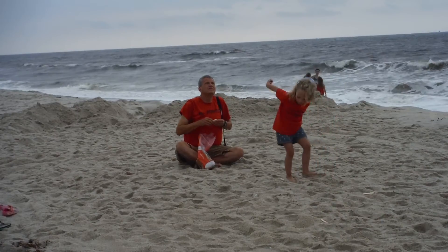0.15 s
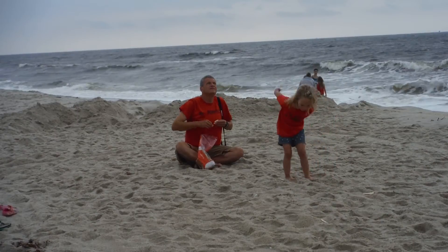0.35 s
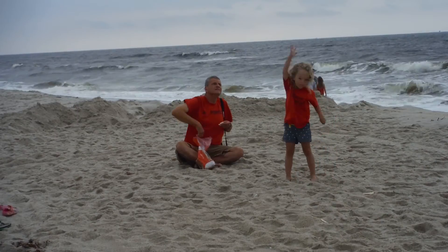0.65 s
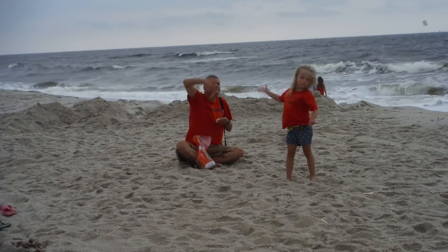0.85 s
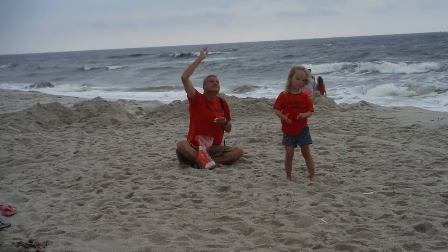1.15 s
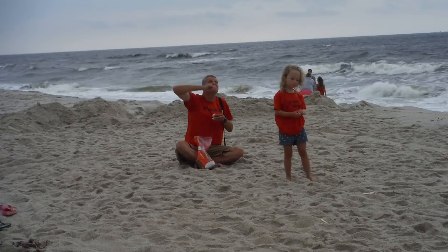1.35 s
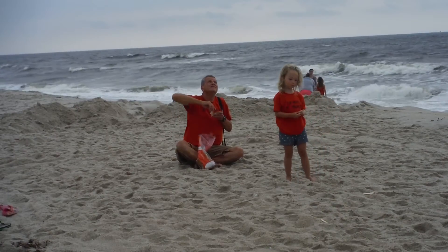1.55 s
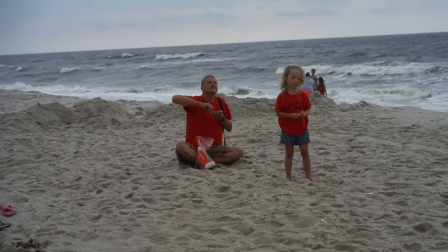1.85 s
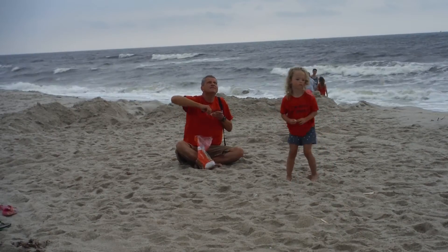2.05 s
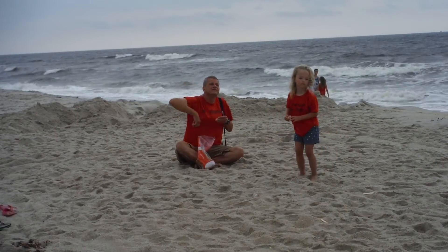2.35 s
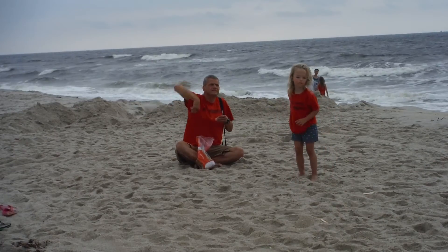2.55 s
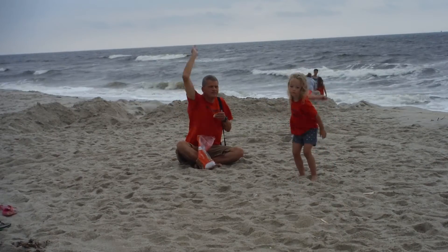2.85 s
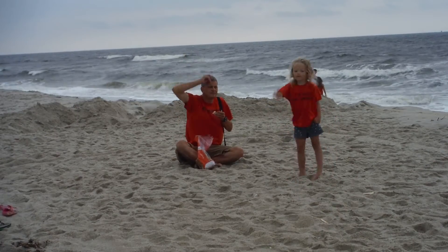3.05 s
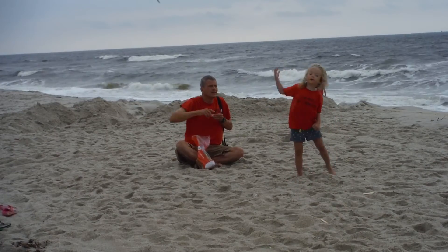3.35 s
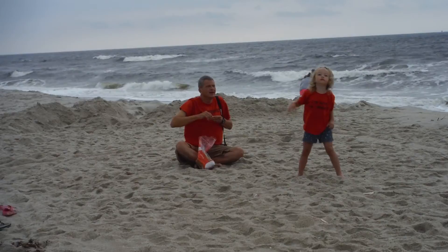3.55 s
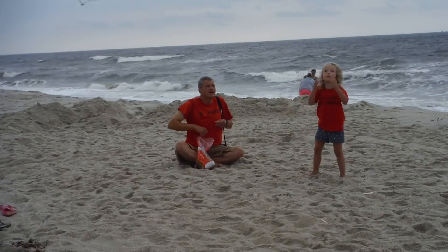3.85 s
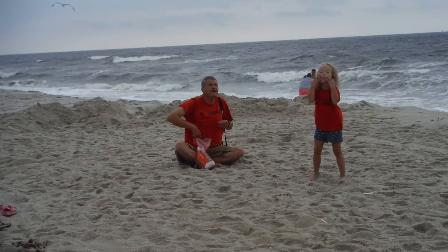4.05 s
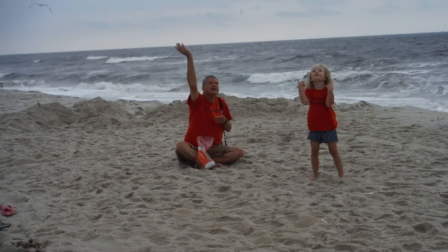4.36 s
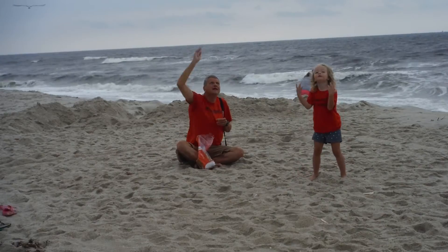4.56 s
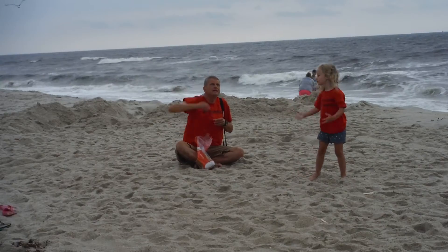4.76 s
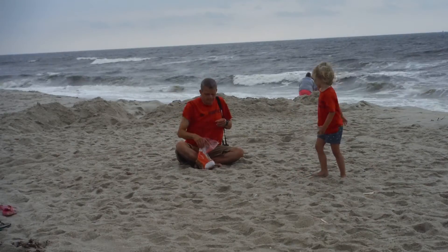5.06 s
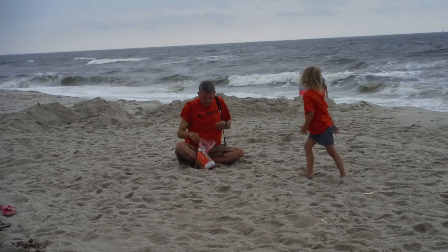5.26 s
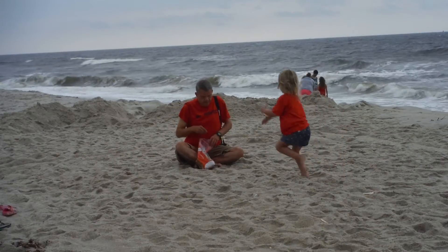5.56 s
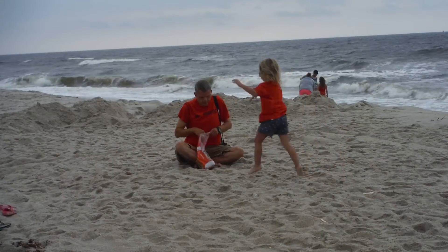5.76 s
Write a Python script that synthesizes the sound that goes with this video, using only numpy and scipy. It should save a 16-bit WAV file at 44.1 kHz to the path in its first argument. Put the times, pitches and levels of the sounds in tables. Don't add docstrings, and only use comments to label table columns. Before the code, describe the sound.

High piercing gull cries and harsh squawks come in bursts above hissing surf, with low wind buffeting bumping a small microphone.

```python
import sys
import numpy as np
from scipy import signal
from scipy.io import wavfile
from scipy.ndimage import uniform_filter1d

SR = 44100
rng = np.random.default_rng(int(sys.argv[2]) if len(sys.argv) > 2 else 0)


def convert_level_to_amplitude(level_db):
    exponent = np.asarray(level_db, float) / 20
    return 10 ** exponent


def wav_record(signal):
    frames = np.transpose(np.atleast_2d(signal))
    bounded = np.clip(frames, -1, 1)
    quanta = np.round(bounded * 32767).astype(np.int16)
    wavfile.write(sys.argv[1], SR, quanta)


N = 260190


def evened(x):
    return x / np.sqrt(np.mean(x ** 2) + 1e-20)


def read(points, hz):
    f, value = np.transpose(points)
    return np.interp(np.log(hz + 1), np.log(f + 1), value)


def add(mix, s, sound):
    part = mix[max(round(s * SR), 0):][:len(sound)]
    part += sound[:len(part)]


def wobble(size, smooth):
    width = max(round(smooth), 1)
    once = uniform_filter1d(rng.standard_normal(N), width)
    return evened(uniform_filter1d(once, width))[:size]


# (time [s], swell [dB])
BREAKERS = [
    (0, -54),
    (1.25, -53.5),
    (2.1, -52),
    (2.85, -52),
    (3.25, -49),
    (4.1, -48.5),
    (4.8, -48.5),
    (5.9, -50),
]
# (frequency [Hz], level [dB])
WASH_COLOUR = [(120, -28), (200, -11), (310, -6), (352, -7), (575, -10.5), (993, -14.5), (1260, -15),
               (1590, -17.5), (3130, -20.5), (4420, -24.5), (5300, -22.5), (8060, -22.5), (15500, -49)]


def surf():
    frames, hz = N // 256 + 5, np.fft.rfftfreq(1024, 1 / SR)
    real, imaginary, patches = rng.standard_normal((frames, 513, 3)).T
    patches = uniform_filter1d(patches, 16, 0)
    patches = evened(uniform_filter1d(patches, 10, 1))
    s, body_db = np.transpose(BREAKERS)
    fizz_db = -11 + 0.44 * (body_db + 51)
    t = np.arange(frames) * 256 / SR
    fizz_share = np.clip(np.log2(hz / 2500 + 1e-9) / 2.06, 0, 1)[:, None]
    field_db = read(WASH_COLOUR, hz)[:, None] + np.interp(t, s, body_db) + 1.26 * patches
    field_db = field_db + fizz_share * (np.interp(t, s, fizz_db) + 17.5)
    field = (real + 1j * imaginary) * convert_level_to_amplitude(field_db - 43)
    return convert_level_to_amplitude(49.5) * signal.istft(field, nperseg=1024, noverlap=768)[1][:N]


def eddy(hz):
    u = np.arange(-4, 4, 2 * np.pi * hz / SR)
    return -u * np.exp(.5 - u ** 2 / 2)


# (time [s], rumble [dB])
GUST_CURVE = [(0, -14), (.1, -29.5), (.34, -21.5), (.92, -20.5), (1.6, -31), (2.02, -31), (2.28, -17),
              (2.68, -20), (2.8, -28), (3.04, -31), (3.1, -19), (3.36, -18), (3.5, -28), (3.68, -30),
              (3.71, -19), (4.12, -26), (4.6, -31), (5.9, -28)]
# (frequency [Hz], level [dB], share of flutter [ratio])
EDDY_SIZES = [
    (26.2, 1, 0),
    (44.36, 5, 0.53),
    (70.4, 1.5, 0.42),
    (108.3, 0.5, 1.27),
    (174, -11, 3),
    (283, -14, 2.5),
]


def wind_rumble():
    s, rumble_db = np.transpose(GUST_CURVE)
    flutter_db = -2 - 0.25 * (rumble_db + 32)
    t, out = np.arange(N) / SR, np.zeros(N)
    lumps_db = 2.0 * wobble(N, smooth=1500)
    for hz, db, share in EDDY_SIZES:
        size = rng.standard_normal(N) * convert_level_to_amplitude(1.16 * np.minimum(rng.exponential(1, N), 4))
        train = size * (rng.random(N) < 1.6 * hz / SR)
        gust_db = np.interp(t, s, rumble_db + share * flutter_db)
        level_db = uniform_filter1d(db - 5.5 + gust_db + share * lumps_db, 400)
        out += evened(signal.oaconvolve(train, eddy(hz), "same")) * convert_level_to_amplitude(level_db)
    return out


# (time [s], peak [dB])
SHARP_POPS = [(0.0209, -15.5), (0.036, -14), (0.5206, -11.5), (0.8374, -11.5), (.967, -13), (0.9928, -15),
              (1.2211, -16), (2.3493, -18), (2.457, -15), (3.1087, -14), (3.189, -13.5), (3.2899, -13.5),
              (3.791, -16), (3.901, -14), (4.3772, -12)]
# (time [s], peak [dB])
HEAVY_THUDS = [(.513, -18), (0.599, -12), (0.809, -8.5), (1.78, -26), (3.103, -18.5), (3.178, -13),
               (3.265, -12.5), (3.345, -11.5), (3.73, -17), (5.044, -24), (.012, -16), (.63, -19),
               (1.36, -21), (1.45, -23), (3.44, -23), (5.3, -23)]
# (time [s], peak [dB], frequency [Hz])
CRISP_SNAPS = [(.373, -15.5, 254), (0.8206, -9.5, 316), (0.8693, -3, 564), (.932, -27, 330),
               (.965, -22, 398), (.991, -23, 400), (1.0894, -19.5, 326), (1.212, -20, 423),
               (1.223, -29, 420), (2.2806, -17, 227), (2.337, -12.5, 372), (2.689, -22, 290),
               (3.157, -21, 370), (4.003, -13.5, 220)]
# (time [s], peak [dB], frequency [Hz])
BROAD_SHOVES = [(0.246, -15, 37.7), (0.274, -16.5, 118), (0.34, -19, 61.9), (0.496, -12.5, 80.7),
                (0.579, -16, 48.4), (0.79, -10.5, 80.7), (1.282, -19, 53.8), (1.441, -21, 37.7),
                (1.627, -22, 37.7), (1.908, -19, 37.7), (2.114, -14, 64.6), (2.257, -12, 75.4),
                (2.474, -15, 51.1), (2.623, -18, 70.0), (2.921, -20, 61.9), (3.093, -24, 37.7),
                (3.1, -15, 61.9), (3.696, -19, 56.5), (3.713, -9, 43.1), (3.968, -14, 40.4),
                (4.063, -14.5, 53.8), (4.352, -14, 37.7), (4.726, -20, 80.7), (5.062, -19, 78.1),
                (5.211, -14, 59.2), (5.424, -20, 86.1), (5.546, -20, 67.3), (5.707, -25, 37.7)]


def wind_thumps():
    pop_hz, thud_hz = 166, 106
    out = np.zeros(N)
    hits = [(*pop, pop_hz) for pop in SHARP_POPS]
    hits += [(*thud, thud_hz) for thud in HEAVY_THUDS]
    for s, db, hz in hits + list(CRISP_SNAPS):
        add(out, s - 2 / (np.pi * hz), convert_level_to_amplitude(db) * eddy(hz))
    for s, db, hz in BROAD_SHOVES:
        add(out, s - 1 / (np.pi * hz), convert_level_to_amplitude(db - 6.5) * eddy(hz))
    return out


# (time [s], peak [dB])
STRAP_TICKS = [
    (0.2226, -39.5),
    (.266, -42),
    (0.696, -35.5),
    (.824, -29.5),
    (1.308, -40.5),
    (1.575, -32),
    (3.4446, -35),
]


def strap():
    tick_hz, decay_s, rise_s = 1232, 0.029, 0.00042
    t, out = np.arange(2000) / SR, np.zeros(N)
    for s, db in STRAP_TICKS:
        envelope = convert_level_to_amplitude(db + 8.0 - 60 * t / decay_s) * (1 - np.exp(-t / rise_s))
        add(out, s, envelope * np.sin(2 * np.pi * tick_hz * t))
    return out


LEVEL, HOLD, ARCH = (0.98, 0.98, 1.005), (.985, 1, 1.002, .97), (.95, 1, 1.005, .99, .91)
RISE, CLIMB, SWOOP = (0.98, 0.99, 1.045), (0.901, 0.991, 1.021, 1.035), (0.86, 0.94, 1.2)
SAG, FALL, SLACK = (1.025, 0.98, 0.94), (1.2, 1.05, 1, .98), (1.035, 0.99, 1.015)
CUP, DIP, SCOOP = (1.025, 1, 1.05), (1.07, 0.98, 1.08), (1.04, .985, .995, 1.045, 1.12)
FLIP, DROOP, HUMP = (.96, 1.02, 1, .88), (1, 1.01, .97, .92), (.97, 1.01, 1, .9)
WEDGE, STEADY, BOWL = (.93, 0.99, 1), (.997, 1, 1.003), (1.045, .985, 1, 1.065)


def bent(rows):
    return [(a, b, *(hz * np.array(bend)), db, *rest) for a, b, hz, db, bend, *rest in rows]


def joined(rows, leap=9):
    groups = [[rows[0]]]
    for row in rows[1:]:
        last = groups[-1][-1]
        if abs(row[0] - last[1]) < .007 and row[2] < leap * last[-2]:
            groups[-1].append(row)
        else:
            groups.append([row])
    return groups


# (frequency [Hz], level [dB])
OVERTONE_COLOUR = [(1000, -16), (2000, 2.5), (3500, 3), (5000, 0), (7000, 7.5), (8500, 0), (10300, -9.5),
                   (11500, -40), (15500, -28)]


def phrase(rows, tilt_db, split, under_db, jitter, drift, edge=0.0026, low_db=-8, flicker_db=4):
    note_fade_db, release = 1, 1.48
    hz, level_db = [], []
    ends = [row[0] for row in rows[1:]] + [rows[-1][1]]
    for (a, _, *pitch_hz, db), end in zip(rows, ends):
        u = np.linspace(0, 1, max(round((end - a) * SR), 8))
        spread = np.linspace(0, 1, len(pitch_hz))
        hz.append(np.polyval(np.polyfit(spread, pitch_hz, len(pitch_hz) - 1), u))
        level_db.append(db - note_fade_db * (u - .5))
    hz = uniform_filter1d(np.concatenate(hz), size=130, mode="nearest")
    level_db = uniform_filter1d(np.concatenate(level_db), size=130, mode="nearest")
    shake = drift[:, round(rows[0][0] * SR):][:, :len(hz)]
    turns = np.cumsum(hz * (1 + jitter * shake[0])) / SR
    k = np.arange(1, 8 * split + 1)[:, None] / split
    colour_db = read(OVERTONE_COLOUR, k * hz) - read(OVERTONE_COLOUR, hz)
    colour_db = colour_db + tilt_db * np.log2(np.maximum(k, 1))
    undertone_db = under_db + flicker_db * shake[1, ::-1]
    colour_db = colour_db + undertone_db * (k % 1 > 0) + low_db * (k < 1)
    partials = convert_level_to_amplitude(colour_db) * (k * hz < 16000) * np.cos(2 * np.pi * k * turns)
    tone = partials.sum(0)
    level_db = level_db - np.minimum(0.6 * abs(np.gradient(hz)), 17)
    n = np.arange(len(hz))
    fade = np.clip(np.minimum(n, n[::-1] / release) / (edge * SR), 0, 1)
    return -np.sqrt(2) * convert_level_to_amplitude(level_db + 1.55 * shake[1]) * tone * fade


def sung(groups, lead_s=.002, **voice):
    out = np.zeros(N)
    for rows in groups:
        add(out, rows[0][0] - lead_s, phrase(rows, **voice))
    return out


# (start [s], end [s], pitch [Hz], level [dB], bend [ratios])
THIN_NOTES = [(1.657, 1.757, 4870, -32, STEADY), (1.757, 1.778, 4900, -38, STEADY),
              (1.12, 1.18, 3190, -48, SAG), (1.18, 1.203, 3080, -46, HUMP), (1.232, 1.275, 3450, -35, DROOP),
              (1.275, 1.312, 3260, -35.5, HUMP), (1.885, 1.91, 3680, -43.5, SAG),
              (2.11, 2.133, 4610, -34, ARCH), (3.345, 3.39, 3010, -42, SAG), (3.39, 3.43, 3210, -42, CLIMB),
              (3.43, 3.52, 3510, -39, LEVEL), (3.52, 3.61, 3600, -41, HOLD), (3.635, 3.675, 3700, -41, RISE),
              (3.635, 3.665, 3290, -38, ARCH), (3.49, 3.53, 3170, -44, SAG), (3.545, 3.6, 3240, -47, LEVEL),
              (1.779, 1.798, 4850, -30, HUMP), (3.775, 3.82, 1605, -42, SWOOP),
              (2.468, 2.496, 1890, -41, SWOOP), (4.685, 4.712, 1810, -42, SWOOP)]


def thin_whistles(drift):
    return sung(joined(bent(THIN_NOTES)), tilt_db=-17.5, split=1, under_db=0, jitter=0.0043, drift=drift)


# (start [s], end [s], pitch [Hz], level [dB], bend [ratios])
BLEND_TONES = [(2.69, 2.732, 5400, -42, LEVEL), (2.69, 2.728, 4080, -47, RISE),
               (2.758, 2.797, 5540, -37, SLACK), (2.762, 2.797, 7850, -42, LEVEL),
               (2.76, 2.795, 4050, -44, SAG), (2.662, 2.68, 7700, -44, SAG),
               (1.598, 1.612, 4560, -36, STEADY), (1.61, 1.628, 8600, -42, WEDGE),
               (1.787, 1.796, 6450, -43, RISE), (4.705, 4.735, 6680, -36, STEADY),
               (4.888, 4.92, 5500, -42, SAG), (4.93, 4.957, 3480, -40, RISE),
               (3.635, 3.655, 7500, -41, RISE), (3.895, 3.912, 6350, -44, STEADY),
               (3.935, 3.943, 5300, -44, STEADY)]


def membrane_blends(drift):
    groups = [[row] for row in bent(BLEND_TONES)]
    return sung(groups, tilt_db=-30, split=1, under_db=0, jitter=.004, drift=drift, edge=.004)


# (start [s], end [s], pitch [Hz], level [dB], bend [ratios])
SECOND_NOTES = [
    (1.071, 1.096, 1630, -52, SWOOP),
    (1.341, 1.374, 2170, -44.5, ARCH),
    (2.64, 2.658, 2220, -34.5, RISE),
    (2.693, 2.736, 2230, -39.5, LEVEL),
    (2.755, 2.8, 2315, -35.5, LEVEL),
    (3.852, 3.88, 3800, -35, FALL),
    (3.842, 3.902, 1900, -38.5, FALL),
    (.386, .4, 2850, -44, LEVEL),
    (1.603, 1.63, 2520, -42, LEVEL),
    (1.777, 1.786, 2600, -41, LEVEL),
]


def second_membrane(drift):
    groups = [[row] for row in bent(SECOND_NOTES)]
    return sung(groups, tilt_db=-6.5, split=0.97, under_db=1.0, jitter=.005, drift=drift)


# (start [s], end [s], first rate [1/s], last rate [1/s], level [dB])
SLOW_CREAKS = [
    (1.755, 1.781, 500, 570, -35),
    (4.285, 4.315, 560, 640, -37),
    (2.842, 2.864, 700, 520, -34),
    (1.343, 1.378, 700, 520, -37.5),
    (3.912, 3.936, 600, 510, -40),
]
# (frequency [Hz], level [dB])
THROAT_COLOUR = [(590, -72), (1000, -19.5), (1400, -11.5), (1560, -16), (1860, -9.5), (2420, -3),
                 (2710, -0.5), (4220, -1), (5350, -8.5), (6560, -5.5), (9750, -20.5), (15000, -44)]


def throat():
    hz = abs(np.fft.fftfreq(2048, 1 / SR))
    log_gain = np.log(convert_level_to_amplitude(np.maximum(read(THROAT_COLOUR, hz), -60)))
    return np.fft.ifft(np.exp(log_gain - 1j * signal.hilbert(log_gain).imag)).real[:512]


def gull_creaks():
    out = np.zeros(N)
    for a, b, first_hz, last_hz, db in SLOW_CREAKS:
        u = np.linspace(0, 1, round((b - a) * SR))
        chance = rng.standard_normal((2, 4000))[:, :len(u)]
        rate_hz = first_hz + (last_hz - first_hz) * u
        turns = np.cumsum(rate_hz * (1 + .6 * chance[0])) / SR
        slaps = np.diff(np.floor(np.maximum.accumulate(turns)), prepend=0) * convert_level_to_amplitude(1.5 * chance[1])
        dull = evened(np.convolve(slaps, throat())[:len(u)])
        bright = 1.2 * u * np.gradient(dull)
        add(out, a, convert_level_to_amplitude(db) * np.sin(np.pi * u) ** 0.58 * (dull + bright))
    return out


# (start [s], end [s], pitch [Hz], level [dB], bend [ratios], undertones [dB])
HOARSE_NOTES = [(1.089, 1.134, 2360, -37.5, SAG, 2.5), (2.071, 2.096, 2615, -30, RISE, 4),
                (2.495, 2.541, 2374, -30, SAG, 3.5), (2.59, 2.674, 2200, -39.5, RISE, 4.5),
                (3.314, 3.345, 2370, -39, RISE, -4), (3.675, 3.729, 2214, -42, CLIMB, 7),
                (3.815, 3.857, 2280, -32.5, LEVEL, 4.5), (4.706, 4.742, 2230, -34, RISE, 7),
                (4.775, 4.83, 1880, -43, LEVEL, -5), (4.845, 4.875, 2250, -36, SAG, 3),
                (4.925, 4.975, 2150, -39, SAG, 4)]


def hoarse_notes():
    quick = np.array([wobble(N, smooth=23), wobble(N, smooth=32)])
    out = np.zeros(N)
    for *row, under_db in bent(HOARSE_NOTES):
        out += sung([[row]], lead_s=.004, tilt_db=-5.0, split=2, under_db=under_db, jitter=.035,
                    drift=quick, edge=.012, flicker_db=1.5)
    return out


# (start [s], end [s], pitch [Hz], level [dB], bend [ratios], undertones [dB])
HALVED_NOTES = [(1.204, 1.233, 2300, -34.5, RISE, -4.5), (1.6, 1.631, 3110, -43, RISE, 4),
                (3.87, 3.954, 4260, -43.5, LEVEL, -5), (4.889, 4.957, 2180, -33, SLACK, -4),
                (5.479, 5.515, 2712, -30, RISE, 1), (2.528, 2.562, 2150, -36.5, SAG, -1),
                (2.56, 2.6, 2050, -48, LEVEL, -1), (2.594, 2.64, 2140, -43, LEVEL, 2.5),
                (4.872, 4.895, 2180, -38, RISE, 3), (3.816, 3.84, 2150, -36, RISE, 4),
                (2.086, 2.104, 2500, -37, RISE, 0.5)]
# (start [s], end [s], pitch [Hz], level [dB], bend [ratios], undertones [dB])
THIRD_NOTES = [
    (2.661, 2.736, 3180, -28, SLACK, -17),
    (2.732, 2.758, 2287, -25, CUP, -10),
]
# (start [s], end [s], pitch [Hz], level [dB], bend [ratios], undertones [dB])
QUARTER_NOTES = [
    (0.397, .418, 2895, -35.5, WEDGE, -2),
    (0.416, 0.429, 3000, -34, LEVEL, -12),
    (2.757, 2.798, 3180, -29, SLACK, -17),
]


def split_notes(drift):
    out = np.zeros(N)
    for split, rows in ((2, HALVED_NOTES), (3, THIRD_NOTES), (4, QUARTER_NOTES)):
        for *row, under_db in bent(rows):
            out += sung([[row]], tilt_db=-6.0, split=split, under_db=under_db, jitter=0.003,
                        drift=drift, low_db=-22, flicker_db=3.5)
    return out


# (start [s], end [s], pitch [Hz], level [dB], bend [ratios])
BRASSY_CRIES = [(1.312, 1.341, 2227, -35.5, LEVEL), (1.586, 1.602, 2560, -29, STEADY),
                (1.786, 1.797, 3830, -38, RISE), (1.795, 1.814, 3900, -33, RISE),
                (1.834, 1.866, 3760, -37.5, BOWL), (2.03, 2.057, 3780, -37, SCOOP),
                (2.795, 2.846, 2246, -28.5, SAG), (3.727, 3.77, 3290, -33, DROOP),
                (3.939, 3.989, 3050, -41.5, HOLD), (4.316, 4.331, 3680, -36, LEVEL),
                (4.498, 4.518, 3484, -32, BOWL), (4.55, 4.572, 3480, -30, BOWL),
                (4.596, 4.625, 3450, -29.5, BOWL), (4.647, 4.687, 3310, -32, BOWL),
                (4.735, 4.768, 2450, -29.5, DROOP), (5.811, 5.829, 2060, -42, SAG)]


def cries(drift):
    groups = [[row] for row in bent(BRASSY_CRIES)]
    return sung(groups, tilt_db=-2.0, split=2, under_db=-16.5, jitter=0.006, drift=drift)


# (start [s], end [s], pitch [Hz], level [dB], bend [ratios])
YODELS = [(1.805, 1.835, 4870, -31, HOLD), (1.872, 1.881, 4800, -30, STEADY),
          (1.881, 1.897, 5000, -38, RISE), (1.905, 1.93, 4670, -34.5, DIP), (1.93, 1.962, 5000, -43, RISE),
          (1.962, 2, 4640, -33.5, CUP), (2, 2.03, 4820, -38, ARCH), (2.05, 2.075, 5020, -34.5, HOLD),
          (3.34, 3.37, 4670, -32.5, RISE), (3.372, 3.39, 6100, -49, ARCH), (3.39, 3.42, 4600, -31.5, SCOOP),
          (3.422, 3.437, 5880, -40, SAG), (3.437, 3.48, 4450, -32.5, SCOOP),
          (3.482, 3.527, 4300, -30.5, SCOOP), (3.522, 3.534, 6000, -36, FLIP),
          (3.534, 3.567, 4370, -28.5, SCOOP), (3.563, 3.58, 6150, -30, FLIP),
          (3.58, 3.612, 4330, -25.5, SCOOP), (3.61, 3.627, 5920, -30, FLIP),
          (3.627, 3.665, 4280, -30.5, SCOOP), (3.665, 3.71, 4370, -29.7, DIP),
          (3.71, 3.757, 4520, -37, SAG), (4.328, 4.365, 4740, -37, RISE),
          (4.376, 4.423, 4620, -37.5, SCOOP), (4.432, 4.476, 4580, -34.5, SCOOP),
          (4.485, 4.501, 4570, -33, SAG), (4.511, 4.533, 4900, -36, RISE), (4.542, 4.553, 4560, -34, SAG),
          (4.565, 4.597, 4990, -35, ARCH), (4.622, 4.65, 4770, -36.5, ARCH),
          (4.685, 4.705, 4660, -36, LEVEL)]


def yodels(drift):
    groups = joined(bent(YODELS), leap=1.12)
    return sung(groups, tilt_db=-12.0, split=2, under_db=-19.5, jitter=0.0092, drift=drift)


# (start [s], end [s], pitch [Hz], level [dB], bend [ratios])
SQUEALS = [(0, .035, 4770, -30.5, SLACK), (.036, .068, 4820, -33, ARCH), (.07, .088, 3790, -40, SLACK),
           (.425, .485, 4100, -34.5, LEVEL), (.484, .502, 4680, -35, CLIMB),
           (.502, .576, 5090, -34.5, HOLD), (.574, .626, 5050, -34, HOLD), (.625, .646, 3940, -36, DIP),
           (.645, .69, 4870, -37, HOLD), (.689, .717, 3710, -36.5, DIP), (.716, .754, 4670, -41.5, ARCH),
           (.754, .792, 3640, -42.5, SAG), (1.608, 1.659, 3810, -31.5, CLIMB),
           (2.104, 2.134, 3930, -32.5, RISE), (2.134, 2.158, 4930, -31.5, CLIMB),
           (2.158, 2.24, 5210, -31.5, LEVEL), (2.238, 2.288, 5070, -30.5, HOLD),
           (2.291, 2.336, 5100, -29.7, HOLD), (2.336, 2.35, 4160, -29, DIP),
           (2.35, 2.394, 4980, -29.5, HOLD), (2.394, 2.418, 3950, -33.5, LEVEL),
           (2.418, 2.441, 4630, -36, ARCH), (5.51, 5.551, 3845, -29, LEVEL),
           (5.551, 5.6, 4950, -29.5, CLIMB), (5.6, 5.685, 5000, -30, HOLD),
           (5.685, 5.732, 4880, -30.5, HOLD), (5.732, 5.751, 3850, -29.5, DIP),
           (5.751, 5.794, 4760, -32.5, ARCH), (5.794, 5.813, 3250, -33.5, SAG)]


def squeals(drift):
    return sung(joined(bent(SQUEALS)), tilt_db=-7, split=2, under_db=-22, jitter=0.0043, drift=drift)


# (start [s], end [s], share spent rising [0-1], level [dB], brightness [dB])
SQUAWKS = [(0.372, 0.425, 0.64, -33, 6), (1.077, 1.136, 0.34, -26.5, 2), (1.328, 1.385, 0.28, -31.5, -6),
           (1.592, 1.626, 0.4, -31, 3), (1.745, 1.79, 0.4, -38, 4), (2.038, 2.118, 0.74, -23, 5),
           (2.464, 2.5, 0.8, -24.5, -3), (2.49, 2.552, 0.12, -17, 3), (2.52, 2.673, 0.7, -28.5, -13),
           (2.832, 2.867, 0.4, -29, -6), (3.286, 3.356, 0.6, -21, 2.5), (3.662, 3.748, 0.74, -28, 1),
           (3.802, 3.87, 0.35, -20, 1), (3.89, 3.949, 0.6, -34, -8), (4.28, 4.327, 0.46, -29, 8),
           (4.696, 4.755, 0.5, -14.5, 5.5), (4.742, 4.843, 0.38, -25.5, 1), (4.822, 4.903, 0.26, -20.5, 5),
           (4.9, 4.995, 0.45, -23.5, 4), (5.458, 5.516, 0.3, -25, 1)]


def gull_rasps():
    rate_hz = 1250 * convert_level_to_amplitude(1.6 * wobble(N, smooth=25) + 1.2 * wobble(N, smooth=300))
    turns = np.cumsum(rate_hz) / SR
    slaps = np.diff(np.floor(turns), prepend=0) * convert_level_to_amplitude(2.7 * rng.standard_normal(N))
    drive = evened(slaps) + .3 * rng.standard_normal(N)
    rasp = evened(signal.oaconvolve(drive, throat())[:N])
    high = signal.sosfilt(signal.butter(2, 5200, "high", fs=SR, output="sos"), rasp)
    low = signal.sosfilt(signal.butter(2, 2900, "low", fs=SR, output="sos"), rasp)
    middle = rasp - low - high
    opening_s = .007
    t = np.arange(N) / SR + opening_s * np.array([[1], [0], [-1]])
    out = np.zeros(N)
    for a, b, rise, db, bright_db in SQUAWKS:
        peak_s = a + np.clip(rise, 0, 1) * (b - a)
        swell = np.interp(t, [a, peak_s, b], [0, 1, 0], 0, 0) ** 1.15
        out += convert_level_to_amplitude(db - 5.5) * (swell * [low, middle, convert_level_to_amplitude(bright_db) * high]).sum(0)
    return out


def scene():
    wind = (wind_rumble() + wind_thumps()) * np.minimum(np.arange(N) / 200, 1)
    slow = np.array([wobble(N, smooth=105), wobble(N, smooth=180)])
    gulls = thin_whistles(slow) + membrane_blends(slow) + second_membrane(slow)
    gulls += gull_creaks() + hoarse_notes() + split_notes(slow)
    gulls += cries(slow) + yodels(slow) + squeals(slow) + gull_rasps()
    gulls = gulls + convert_level_to_amplitude(-12.5) * np.roll(gulls, 260)
    return np.tile(surf() + wind + strap() + gulls, (2, 1))


def band_limit(x):
    return signal.sosfilt(signal.butter(12, 15670, fs=SR, output="sos"), x)


def record(dry):
    mix = signal.sosfilt(signal.butter(2, 18, "high", fs=SR, output="sos"), dry)
    mix = signal.oaconvolve(mix, signal.firwin(255, 15750, fs=SR)[None], "same")
    return band_limit(mix)


dry = scene()
out = record(dry)
wav_record(out)
```